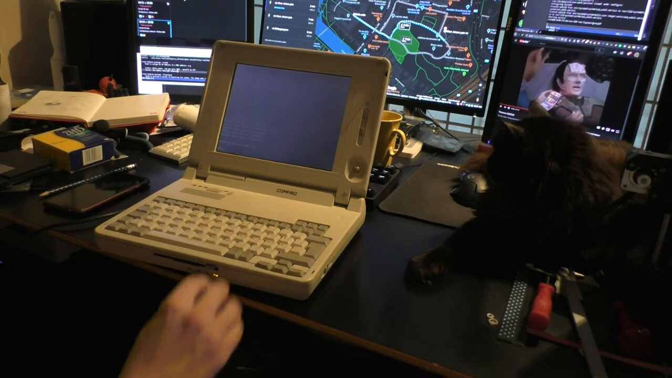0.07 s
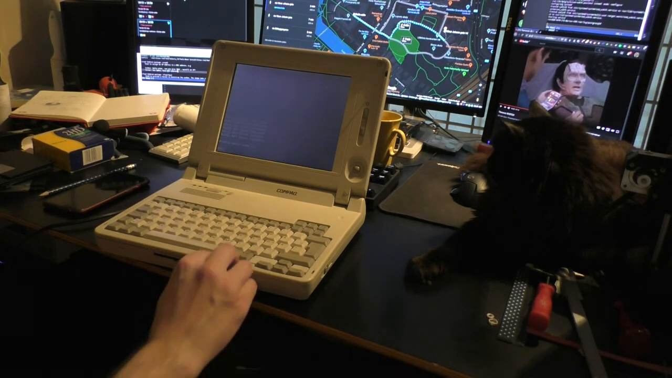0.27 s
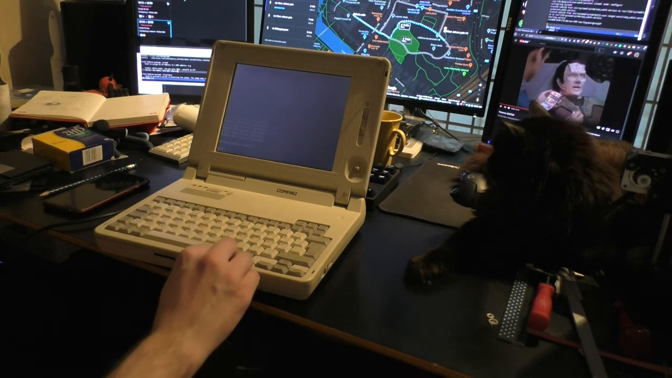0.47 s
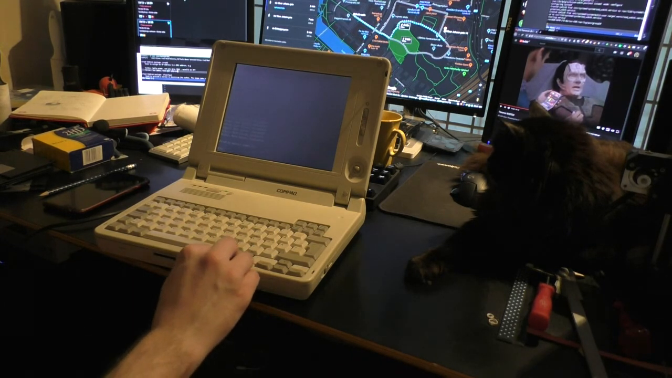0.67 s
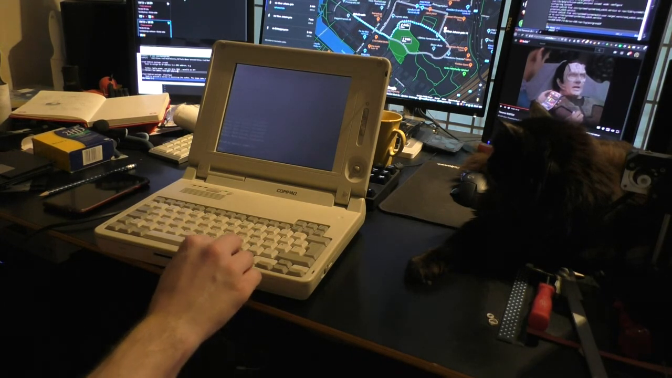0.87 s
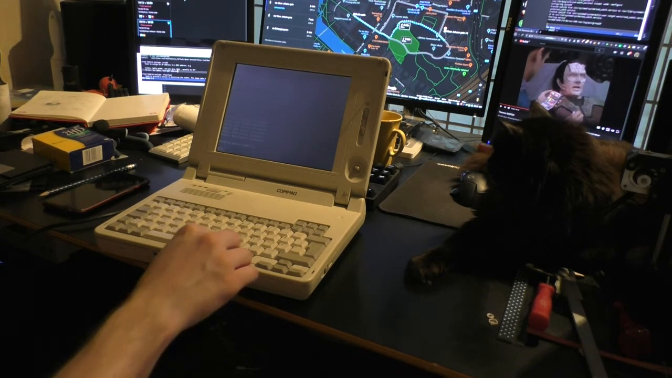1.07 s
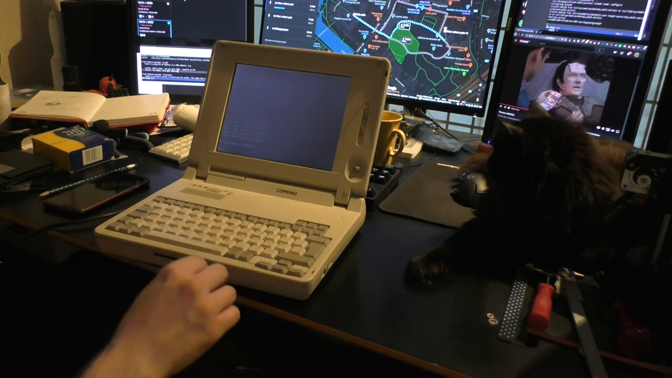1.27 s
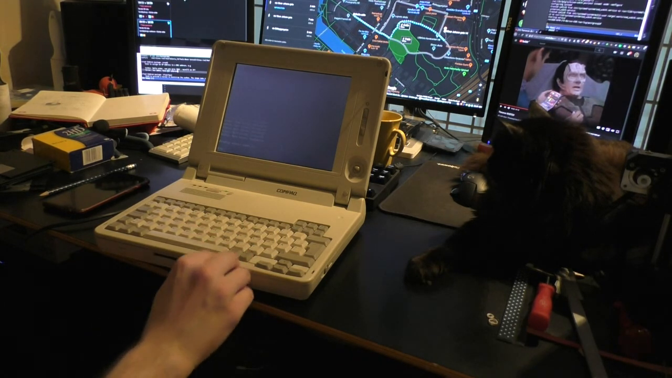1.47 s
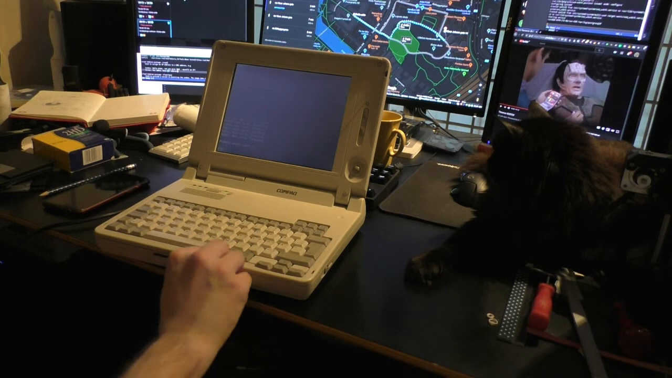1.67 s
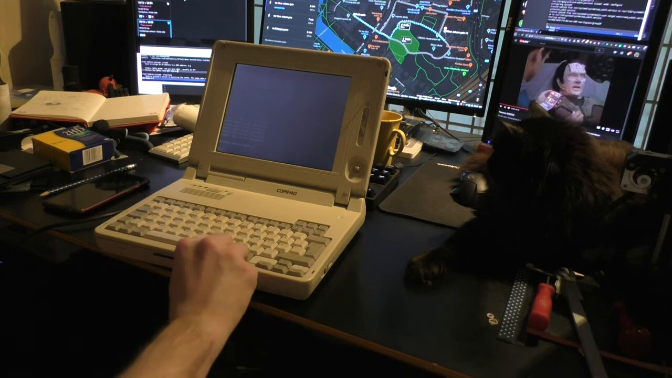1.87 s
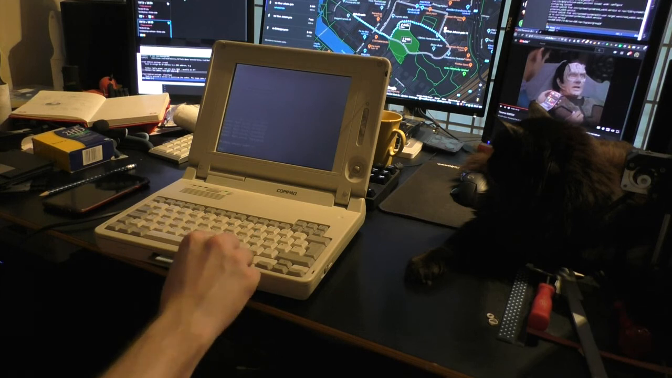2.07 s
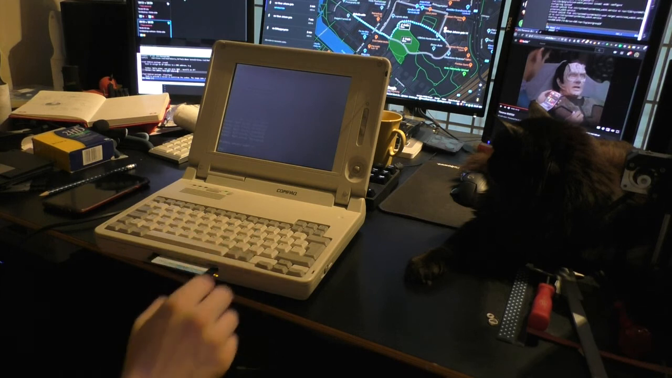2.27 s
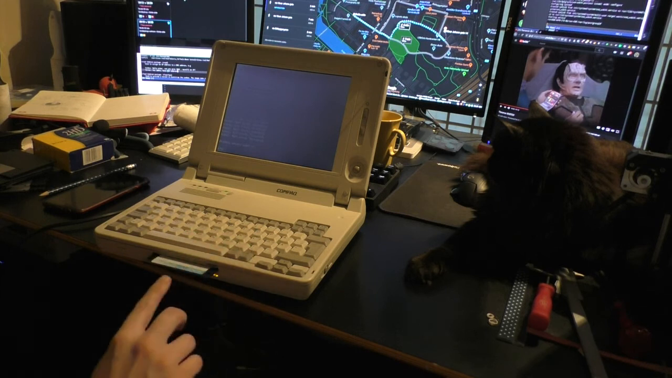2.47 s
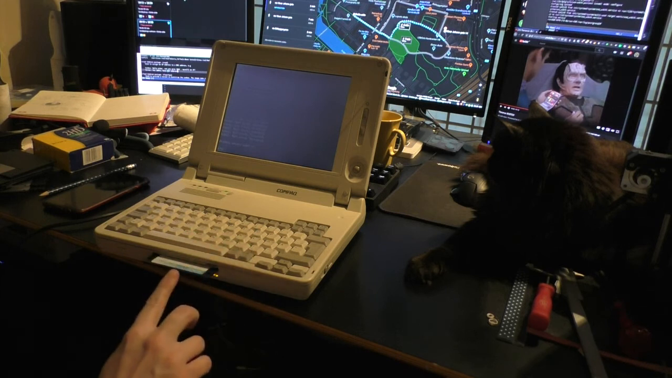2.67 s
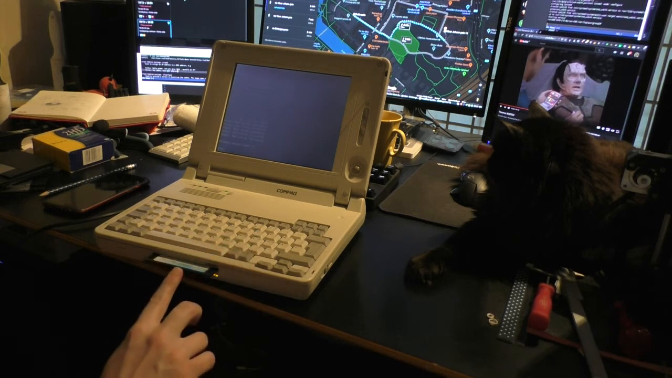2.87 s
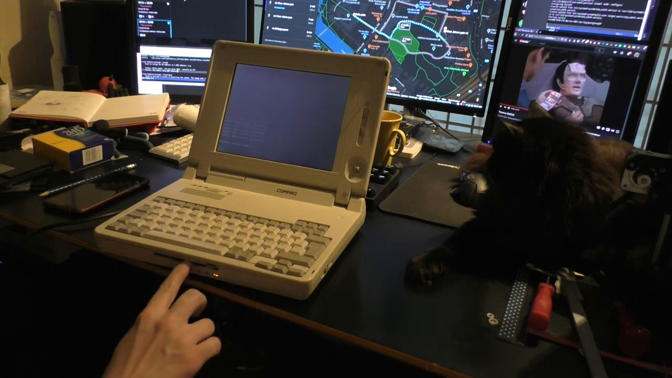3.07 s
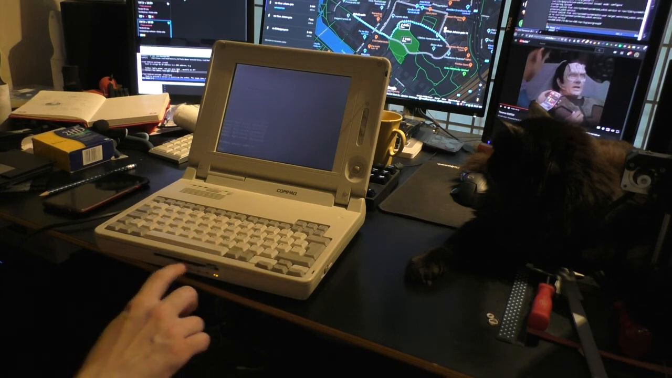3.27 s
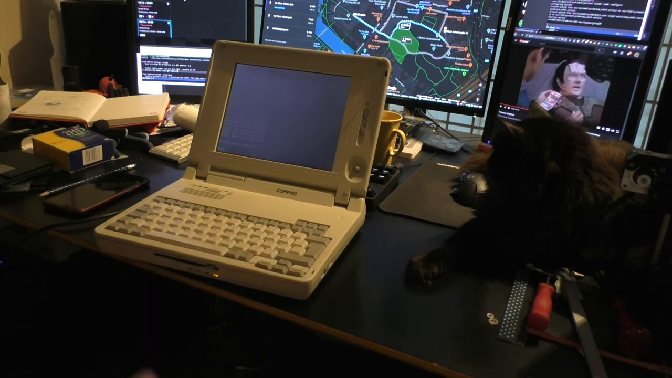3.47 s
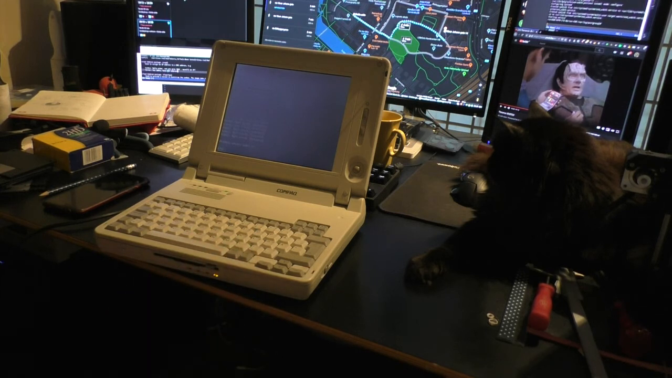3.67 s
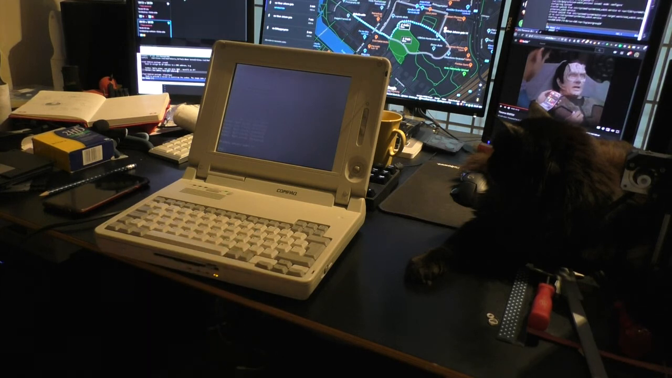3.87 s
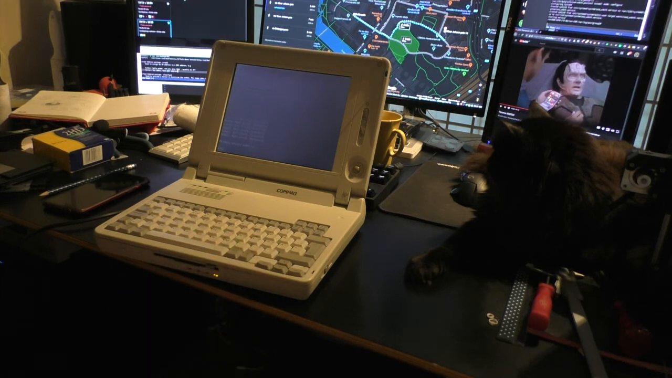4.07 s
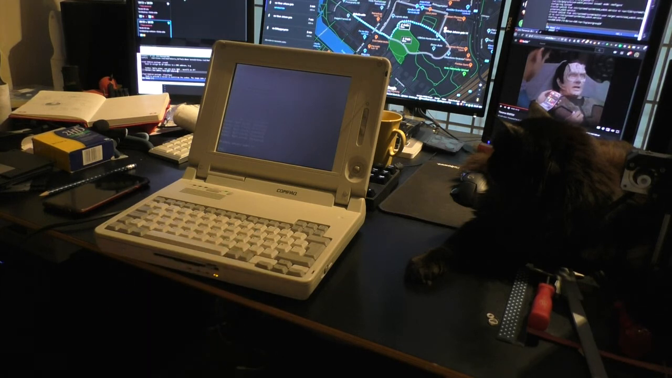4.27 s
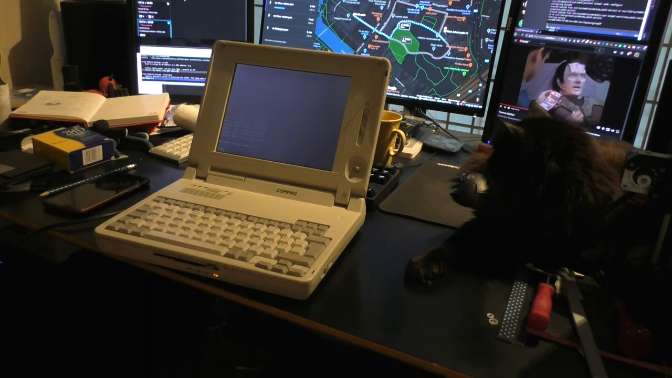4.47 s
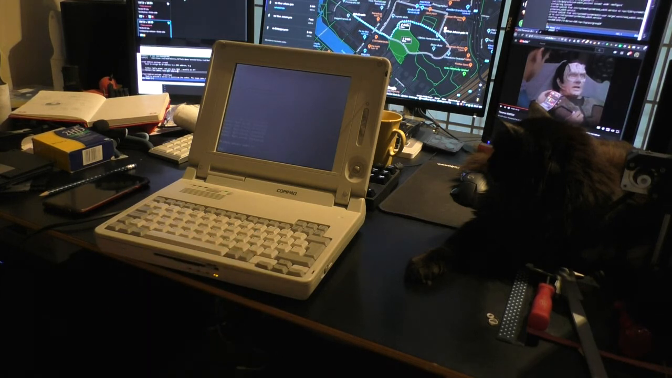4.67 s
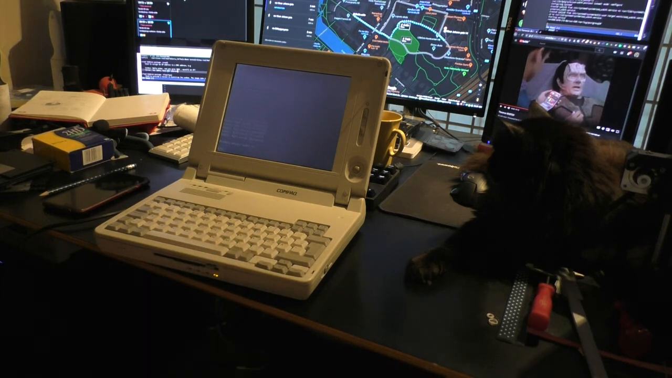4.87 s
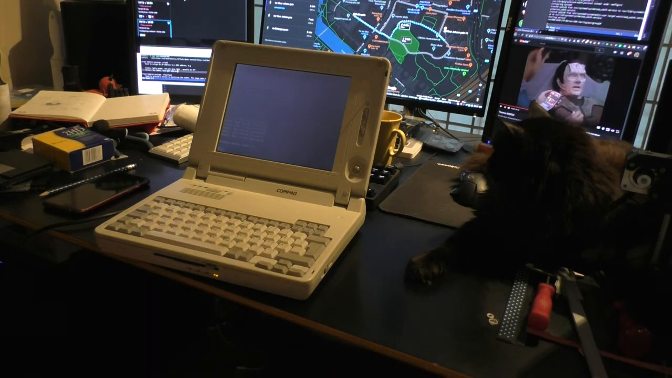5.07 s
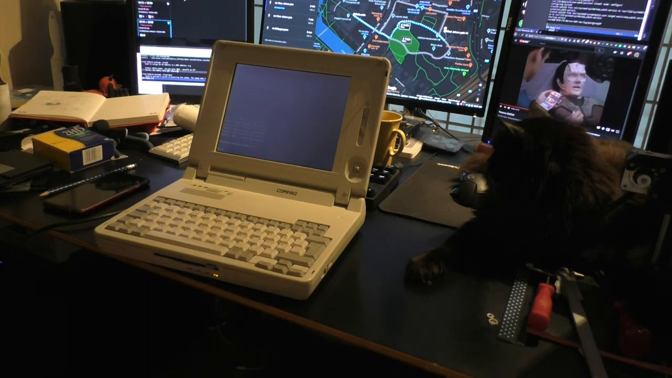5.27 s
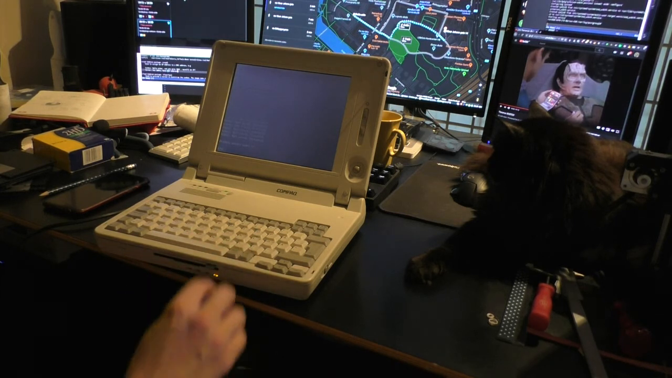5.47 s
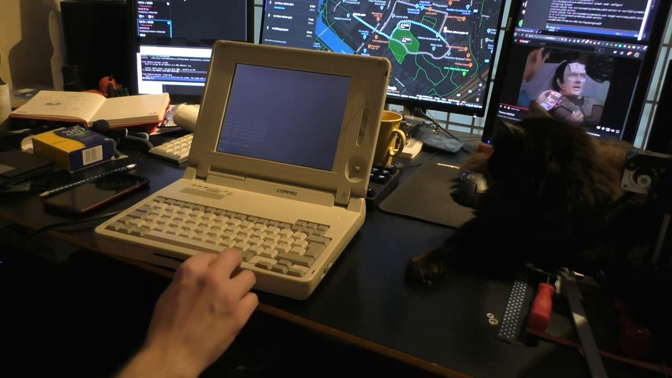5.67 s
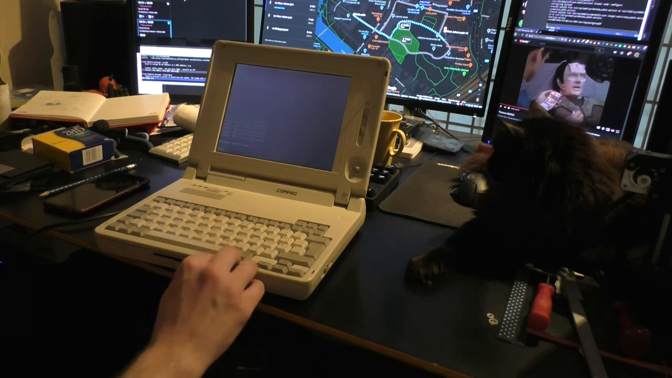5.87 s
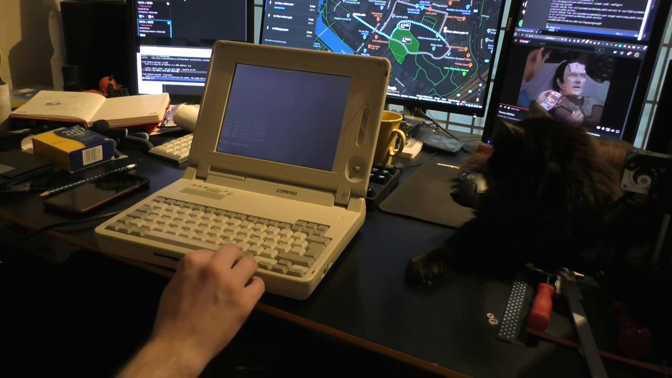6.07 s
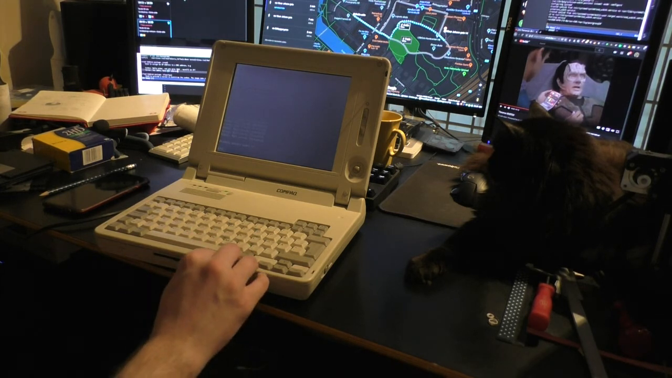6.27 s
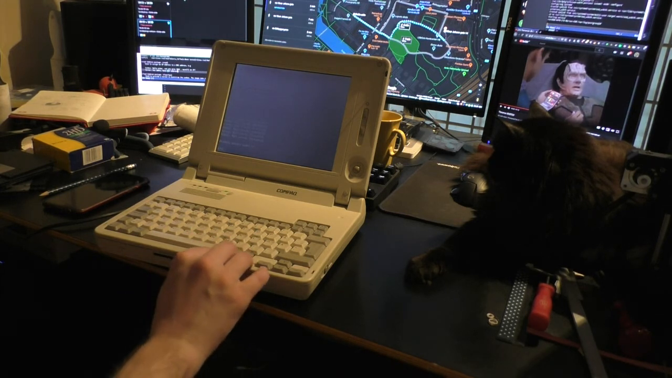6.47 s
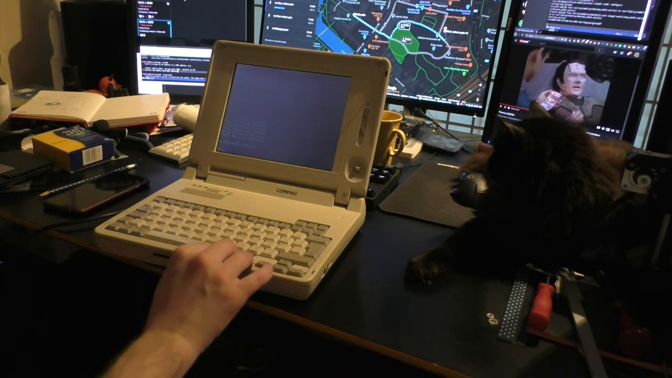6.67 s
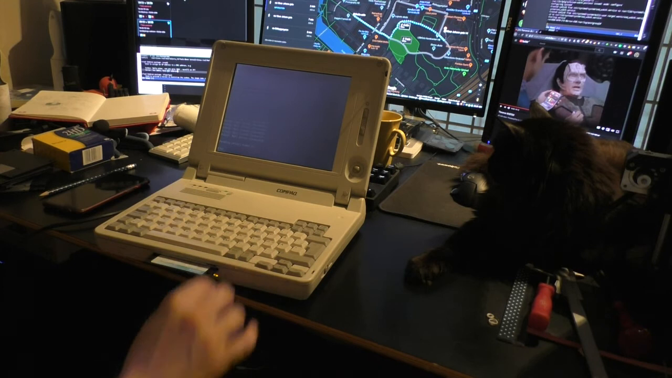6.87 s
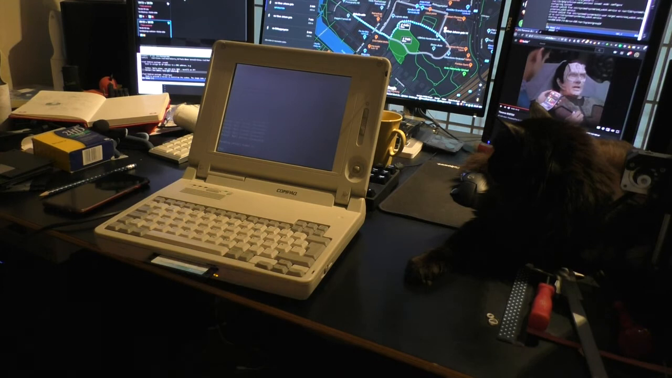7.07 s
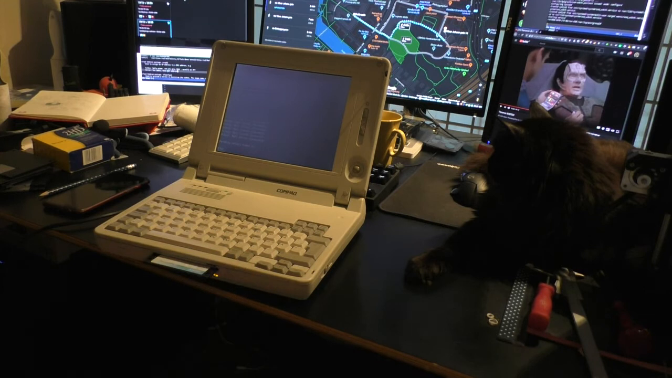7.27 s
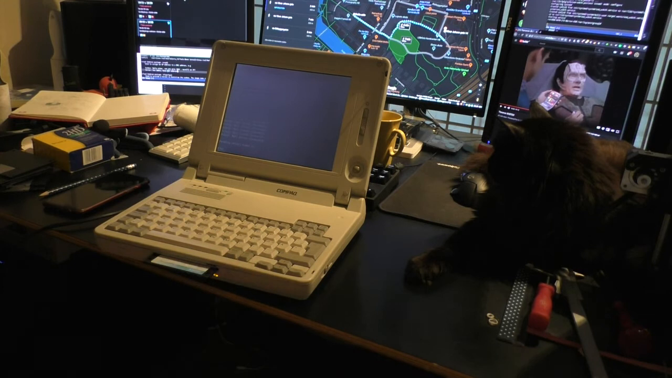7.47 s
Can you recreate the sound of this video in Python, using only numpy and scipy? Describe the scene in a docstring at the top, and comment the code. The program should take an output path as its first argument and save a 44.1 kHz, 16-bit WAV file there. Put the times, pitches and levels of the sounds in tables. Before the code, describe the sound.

Close up in a quiet room, a floppy drive struggles to read, its unsteady motor whine mixed with the scratchy rubbing of the disk. It winds down and plastic clicks pop the disk out of the laptop. A sharp latching clack and a desk thump restart the whining and rasping for a few seconds. It slows again and more eject clicks follow, with soft computer fans underneath throughout.

```python
"""An old laptop on a desk in a quiet room, heard up close in stereo, tries to read a floppy disk.
At first the drive whines and rasps at a wavering speed, the rubbing disk catching now and then.
It coasts down, and near 2 s the disk is ejected with plastic clicks and slides that ring the case.
Pushed back in, the disk latches at 3.1 s with a loud clack and a bump through the desk. The drive labours
again, runs down after 6.5 s, and the disk is ejected once more. Fan noise carries on underneath."""
import sys
import numpy as np
from scipy import signal
from scipy.fft import rfft, irfft, next_fast_len
from scipy.io import wavfile
from scipy.ndimage import uniform_filter1d

SR = 44100
rng = np.random.default_rng(int(sys.argv[2]) if len(sys.argv) > 2 else 0)


def to_wav(s):
    """Save 16-bit WAV."""
    ch = np.atleast_2d(s).T  # columns
    pcm = np.round(np.clip(ch, -1, 1) * 32767)  # PCM
    wavfile.write(sys.argv[1], SR, pcm.astype(np.int16))


N = 331632
TIME = np.arange(N) / SR
FFT_SIZE = next_fast_len(N + SR, True)
FREQS = np.maximum(np.fft.rfftfreq(FFT_SIZE, 1 / SR), 1)


# whine partials, in-between orders from stick and slip: (multiple, level [dB], phase scatter [rad])
WHINE_PARTIALS = [(1.5, -24, 0.53), (2, -7, 0.5), (2.125, -29, 0.55), (2.5, -26, 1.6), (2.625, -28, 1),
                  (3, -5.3, 0.55), (4, -6, 0.43), (5, -7.5, 0.9), (6, -14.5, 0.49), (7, -16, 1.0)]
# frame resonances where a passing overtone sings out: (frequency [Hz], width [Hz], lift [dB])
FRAME_MODES = [(2100, 61, 6.5), (2875, 84, 6)]

def whine(rotor_phase, pitch_hz, slip, tone_db, overtone_db, flutter_db=0.82, unsteady_db=2.9):
    """The drive's tone, a little to the left, breaks up as it runs down; slip scatters its overtones."""
    slowing = np.gradient(uniform_filter1d(pitch_hz, size=900)) < 0
    stalling = np.clip((688 - pitch_hz) / 80, 0, 1) * slowing
    phase = rotor_phase + 1.43 * uniform_filter1d(stalling, size=900) * drift(83)
    fundamental = np.sin(phase + np.array([[0.4], [0]]))  # the two sides are slightly out of phase
    out = from_db(tone_db + flutter_db * drift(25)) * fundamental * pan(left_db=1.5)
    for multiple, level_db, scatter in WHINE_PARTIALS:
        partial = np.sin(multiple * phase + scatter * slip * drift(26) + np.array([[0], [0.35]]))
        lift_db = peaks_db(FRAME_MODES, multiple * pitch_hz)
        gain = from_db(overtone_db + level_db + lift_db + unsteady_db * slip * drift(24))
        out += gain * partial * pan(left_db=3.5)
    return np.sqrt(2) * out


# colours of the rubbing disk's rasp and hiss: (frequency [Hz], level [dB])
RASP_COLOUR = [(100, -9.5), (350, -5.5), (560, -14.5), (700, -8), (850, -32), (1050, -4), (1600, -7),
               (1850, 1.5), (3100, 3), (4200, -4), (6500, -19), (9000, -17.5), (16000, -49)]
HISS_COLOUR = [(3000, -10), (5200, 9.5), (5900, 5), (6600, 8.5), (8300, -1.5), (9600, 0), (10800, 5),
               (12200, 3), (14000, 1.5), (16000, -8)]
# resonances of the drive: (frequency [Hz], width [Hz], lift [dB])
RASP_MODES = [(1076, 74, 11), (1174, 97, 5.8), (1348, 30, 8.4), (1499, 117, 10.2), (1760, 75, 7.8),
              (1830, 22, 2.1), (2448, 21, 8.5), (2870, 25, 1.3), (3550, 190, 2.1)]
# where the drive sits in the stereo image: (frequency [Hz], left minus right [dB])
DRIVE_POSITION = [(150, -4.5), (400, -0.5), (1100, 3), (1800, 3.5), (4000, 1), (8000, 0), (12000, 3),
                  (15500, 1.5)]

def rubbing(rotor_phase, rasp_db, hiss_db, grain_db=1.5, throb=0.28):
    """Friction grains, pressed out in step with the rotor, ring the drive's frame and hiss above it."""
    beat = np.cos(rotor_phase) + np.cos(rotor_phase * 9 / 8)
    pressure = rms_one((1 + throb * beat) * from_db(grain_db * drift(170)))
    fine_grains = rms_one(from_db(grain_db * drift(700)))
    rasp = from_db(rasp_db) * pressure * stereo_noise(alike=0.7)
    hiss = from_db(hiss_db) * fine_grains * stereo_noise(alike=1.0)
    # the thin metal cover has many narrow peaks and dips in the treble
    cover_modes = [(hz, 80, 1.7 * rng.standard_normal()) for hz in rng.uniform(3800, 15000, 60)]
    place = pan(at_hz(DRIVE_POSITION, FREQS))
    return (through(rasp, place * response(RASP_COLOUR, RASP_MODES))
            + through(hiss, place * response(HISS_COLOUR, cover_modes)))


# resonances that slipping sets squealing: (frequency [Hz], relative level [dB])
SQUEAL_MODES = [(1056, -12.3), (2396, -11.3), (2547, -11.3)]

def squeals(wander_hz=28, flicker_db=0.5):
    """Narrow resonances whose strength and phase wander as the contact catches and lets go."""
    out = 0
    for hz, level_db in SQUEAL_MODES:
        swing = (drift(wander_hz) + 1j * drift(wander_hz)) * np.exp(2j * np.pi * hz * TIME)
        out += from_db(level_db) * rms_one(swing.real * from_db(flicker_db * drift(2.5)))
    return out * pan(left_db=3.5)


# the two tries at reading: (motor on [s], motor off [s], coasting time constant [s])
MOTOR_RUNS = [(-1, 0.85, 0.24), (3.09, 6.56, 0.18)]

def motor(spin_up_s=0.055, seating_s=0.075, seating_db=42):
    """Share of full speed as the motor spins up and coasts down, and level lost until the disk seats."""
    speed, unseated_db = np.zeros((2, N))
    for on, off, coast_s in MOTOR_RUNS:
        age, coasting = np.maximum(TIME - on, 0), np.maximum(TIME - off, 0)
        speed += (1 - np.exp(-age / spin_up_s)) * np.exp(-coasting / coast_s)
        unseated_db += (TIME > on) * seating_db * np.exp(-age / seating_s)
    return speed, unseated_db


# the whine's fundamental at full speed, one curve per try: (time [s], level [dB])
FIRST_LEVEL = [(0.0, -47.5), (0.046, -45.5), (0.534, -44.5), (0.566, -46.5), (0.71, -45), (0.73, -50.5),
               (0.84, -48)]
SECOND_LEVEL = [(3.35, -42.5), (3.42, -41.5), (3.78, -44.5), (4.34, -42), (4.59, -44), (4.65, -41.5),
                (4.96, -47), (5.14, -42), (5.17, -52.5), (5.26, -44), (5.77, -40.5), (6.31, -45),
                (6.33, -43), (6.54, -47.5)]
# the disk briefly catches (plus) or runs free (minus):
# (time [s], half length [s], overtones [dB], rasp [dB], hiss [dB])
DISK_CATCHES = [(0.25, 0.12, 3, -1, 0.9), (0.53, 0.13, -0.5, -0.4, -2), (0.73, 0.016, -10, -1.5, -2),
                (0.778, 0.024, 4.5, 1, 1), (0.87, 0.028, -8, 2, 2), (0.922, 0.055, 0, 5, 0),
                (4.37, 0.035, 8, -1, 1.3), (4.751, 0.03, 5, -1.5, 1.5), (5.779, 0.027, 5.5, -3.5, 2),
                (6.122, 0.12, -7.5, 0.7, -1), (6.361, 0.033, 5.5, 3.5, -0.5), (6.42, 0.03, -4, 2.5, -6),
                (6.544, 0.038, -2.5, 2, -4), (6.605, 0.024, -6, 3, 6)]

def drive_levels(speed, unseated_db, slip):
    """Every layer follows speed and seating; slip drains the overtones and feeds the rasp a little."""
    speed_db = 20 * np.log10(speed + 1e-9)
    squeak_db, scrape_db, fizz_db = sum(np.outer(extra_db, np.exp(-((TIME - s) / half_s) ** 2))
                                        for s, half_s, *extra_db in DISK_CATCHES)
    tone_db = in_time([*FIRST_LEVEL, *SECOND_LEVEL]) + 2.4 * speed_db - unseated_db
    overtone_db = -42.5 - 7.0 * slip + 2.9 * speed_db - 0.21 * unseated_db + squeak_db
    rasp_db = -43.5 + 1.9 * (slip - 1) + 1.56 * speed_db - 0.11 * unseated_db + scrape_db
    hiss_db = -51 + 2.8 * speed_db - unseated_db + fizz_db
    return tone_db, overtone_db, rasp_db, hiss_db


# the whine at full speed, wandering as the disk drags, one curve per try: (time [s], pitch [Hz])
FIRST_WANDER = [(0.0, 720.2), (0.138, 705), (0.23, 717), (0.41, 711), (0.442, 703), (0.62, 715),
                (0.726, 701), (0.84, 706)]
SECOND_WANDER = [(3.35, 709), (3.62, 706.4), (3.68, 712), (3.8, 715), (3.93, 693.6), (4.06, 708),
                 (4.34, 698.5), (4.56, 711.9), (4.62, 697), (4.68, 699), (4.8, 719.6), (4.93, 725),
                 (5.11, 716), (5.21, 732), (5.26, 713.4), (5.51, 705.3), (6.26, 709.5), (6.54, 695)]
# how badly the parts slip, smooth just after spin-up: (time [s], slip [1 = usual])
SLIP_CURVE = [(0, 1.03), (.55, 1.3), (.85, 0.44), (3.2, 0.21), (3.7, .35), (4.1, 1.07), (5.0, 1.32),
              (6.15, 1.25), (6.5, 0.45)]

def floppy_drive(jitter=0.00209):
    """One motor turns the unevenly dragging disk; returns its whine and its friction noise."""
    speed, unseated_db = motor()
    slip = in_time(SLIP_CURVE)
    pitch_hz = speed * in_time([*FIRST_WANDER, *SECOND_WANDER])
    tone_db, overtone_db, rasp_db, hiss_db = drive_levels(speed, unseated_db, slip)
    rotor_phase = 2 * np.pi * np.cumsum(pitch_hz * (1 + jitter * slip * drift(16.15))) / SR
    friction = rubbing(rotor_phase, rasp_db, hiss_db) + from_db(rasp_db) * slip * squeals()
    return whine(rotor_phase, pitch_hz, slip, tone_db, overtone_db), friction


# button, latch and shutter: (time [s], level [dB], t60 [s], bass [dB], treble [dB], top [dB], ring [Hz])
LATCH_CLICKS = [ (1.595, -49.5, 0.058, 8, -6, -14, 490), (1.743, -39, 0.085, 3, 0.5, -4.5, 1900),
                (1.868, -42, 0.13, 3, -8, -13, 1030), (1.874, -35, 0.074, -1, -1, -9, 1020),
                (1.877, -29.5, 0.06, 2.5, -1, -7, 1040), (1.887, -37.5, 0.12, 3, 17.5, 11, 1040),
                (2.018, -42.5, 0.078, 2, 3, -6, 2100), (2.130, -33, 0.11, -8, 1.5, 7.5, 2370),
                (2.140, -32.5, 0.054, -1, 7, 3, 2860), (2.868, -50.5, 0.28, -1, -7, -24, 2190),
                (2.909, -47.5, 0.062, -4, -5, -10, 1330), (2.933, -44.5, 0.17, 3, -0.5, -15, 2020),
                (3.07, -38.5, 0.1, 0, 6, 0, 1330), (3.086, -18, 0.052, -2, -4.5, 3, 3160),
                (3.091, -16, 0.04, -19, 1, 3, 1324), (3.101, -13, 0.009, 7, 6, 2, 1740),
                (6.619, -32.5, 0.16, -4, 0.5, -6.5, 2660), (6.820, -44.5, 0.11, -11, 11, -8, 1050),
                (6.860, -32.5, 0.092, -9, -3.5, 7, 2470), (6.869, -36, 0.068, -1, -8, 8, 4800),
                (6.887, -40, 0.05, 4, 9, -6, 1040), (7.099, -50.5, 0.049, 6, -1, -7, 2260),
                (7.241, -46.5, 0.091, -10, -12, -26, 1210), (7.244, -47, 0.11, -24, -14, -26, 1560)]
# disk and button sliding: (start [s], end [s], level [dB], bass [dB], treble [dB])
DISK_SLIDES = [(1.004, 1.034, -47.5, -8, -7), (1.446, 1.468, -59, 6, -4), (1.566, 1.589, -54.5, 2, -11),
               (1.82, 1.842, -52, 11, -6), (2.027, 2.095, -55, 0, -1), (2.083, 2.128, -46.5, -5, -0.5),
               (2.961, 3.053, -56, 1, 2), (3.037, 3.108, -49.5, -11, -2), (6.772, 6.83, -54.5, -2, -9),
               (6.822, 6.861, -46, -5, 4), (7.227, 7.235, -50, 12, -13)]
# colour of the struck plastic case: (frequency [Hz], level [dB])
CASE_COLOUR = [(80, -38), (200, -10.5), (420, -7.5), (600, -6.5), (820, -12), (1000, -4.5), (1900, -6),
               (3300, -7.5), (6000, -11.5), (10000, -13), (13000, -14), (16000, -20)]
# its resonances: (frequency [Hz], width [Hz], lift [dB])
CASE_RESONANCES = [(405, 80, 9.2), (984, 35, 2), (1050, 59, 3.4), (1360, 35, 5.5), (1650, 36, 3.9),
                   (2170, 75, 4.4), (3370, 230, 2.5), (4100, 42, 1.6), (4490, 100, 7.5)]

def eject_mechanism(attack_s=0.00044, slide_ramp_s=0.0084, ring_db=11.0, chatter_db=0.5):
    """Clicks are brief swarms of plastic contacts, slides are longer ones; both ring the case."""
    contacts, t = np.zeros((2, N)), TIME[:SR // 3]
    for s, level_db, t60, bass_db, treble_db, top_db, ring_hz in LATCH_CLICKS:
        tint = [(400, bass_db), (1100, 0), (3000, treble_db), (12000, top_db)]
        ring = [(ring_hz, 0.12 * ring_hz, ring_db)]
        swarm = tinted(stereo_noise(alike=0.84, size=len(t)), tint, CASE_COLOUR, ring)
        add(contacts, s, swarm * from_db(level_db - 60 * t / t60) * (1 - np.exp(-t / attack_s)))
    for start, end, level_db, bass_db, treble_db in DISK_SLIDES:
        stroke = np.clip(np.minimum(t, end - start + 0.011 - t) / slide_ramp_s, 0, 1)
        tint = [(400, bass_db), (1100, 0), (4000, treble_db), (14000, treble_db - 6.0)]
        scrape = tinted(stereo_noise(alike=0.91, size=len(t)), tint, CASE_COLOUR)
        add(contacts, start, from_db(level_db) * stroke * scrape)
    chatter = rms_one(from_db(chatter_db * drift(540)))
    place = pan(0.74 * at_hz(DRIVE_POSITION, FREQS))
    return through(contacts * chatter, place * response(CASE_COLOUR, CASE_RESONANCES))


# dull bumps through the desk: (time [s], level [dB], t60 [s])
DESK_BUMPS = [(1.825, -49, 0.19), (1.876, -55, .22), (3.094, -33, 0.38), (7.32, -57, .12)]
# colour of the desk top: (frequency [Hz], level [dB])
DESK_COLOUR = [(40, -37), (90, -11), (125, 1.5), (165, -3), (240, -6.5), (350, -7), (520, -12), (900, -31)]
# its resonances: (frequency [Hz], width [Hz], lift [dB])
DESK_RESONANCES = [(125, 14, 8), (198, 25, 4), (370, 30, 5)]

def desk():
    """The desk top booms briefly, a little to the right, when the laptop is pushed."""
    bumps, t = np.zeros((2, N)), TIME[:SR // 2]
    for s, level_db, t60 in DESK_BUMPS:
        add(bumps, s, from_db(level_db - 60 * t / t60) * stereo_noise(alike=0.94, size=len(t)))
    return through(bumps, response(DESK_COLOUR, DESK_RESONANCES)) * pan(left_db=-2.5)


# decay of the room around the desk: (frequency [Hz], t60 [s])
ROOM_DECAY = [(150, 0.77), (1000, 0.63), (4000, 0.32), (9000, 0.43), (15000, 0.17)]

def room(sound, build_s=0.0023):
    """Diffuse reflections, different on each side, dying sooner in the treble."""
    t, tail = TIME[:SR // 2], 0
    edges = np.geomspace(80, 16000, 9)
    for low, high in zip(edges, edges[1:]):
        bandpass = signal.butter(2, [low, high], "band", fs=SR, output="sos")
        band = signal.sosfilt(bandpass, stereo_noise(alike=0.76, size=len(t)))
        tail += band * from_db(-60 * t / at_hz(ROOM_DECAY, np.sqrt(low * high)))
    tail = rms_one(tail * (1 - np.exp(-t / build_s))) / np.sqrt(len(t))
    return through(sound, rfft(tail, FFT_SIZE))


# colour of the fan noise in the room: (frequency [Hz], relative level [dB])
FAN_COLOUR = [(15, -9), (25, -15), (49, -4), (92, -7), (137, 2.5), (335, -8), (451, -9), (754, -25.5),
              (887, -7), (1020, -10.5), (1230, -7.5), (2280, -15.5), (4370, -18.5), (7920, -28.5),
              (16000, -24)]
# steady tones of running computers: (frequency [Hz], level [dB])
IDLE_TONES = [(145.3, -76), (1211, -75.5), (2396, -83), (2950, -77.5), (3015, -80), (3187, -81),
              (3354, -77), (3515, -82), (3784, -81.5), (4134, -77), (4172, -95), (4328, -81), (4441, -73),
              (4716, -82), (4867, -85), (5254, -82.5), (5523, -93), (6062, -115), (6336, -89), (6605, -82)]

def fans(air_db=-57.5, waver_rad=0.33):
    """Room tone: a wide wash of fan noise, with faint wavering computer tones to the left."""
    place = pan(at_hz([(100, -2.0), (400, 0.5), (1000, 0.5), (4000, 1.0), (7000, 0.4)], FREQS))
    modes = [(740, 660, 1.2), (4420, 680, 4.8), (6200, 89, 4.5)]
    air = through(stereo_noise(alike=0.65), place * response(FAN_COLOUR, modes))
    tones = sum(from_db(db) * np.sin(2 * np.pi * hz * TIME + waver_rad * drift(3.8))
                for hz, db in IDLE_TONES)
    return from_db(air_db) * air + np.sqrt(2) * tones * pan(left_db=4.5)


def from_db(db):
    """Decibels to gain."""
    return 10 ** (np.asarray(db) / 20)


def rms_one(x):
    """Scale to unit rms."""
    return x / np.sqrt(np.mean(x ** 2) + 1e-20)


def in_time(points):
    """Join (time [s], value) points by straight lines."""
    return np.interp(TIME, *np.transpose(points))


def at_hz(points, hz):
    """Read (frequency [Hz], value) points on a log-frequency axis."""
    f, value = np.transpose(points)
    return np.interp(np.log(hz), np.log(f), value)


def peaks_db(modes, hz):
    """Summed lift of resonances given as (frequency [Hz], width [Hz], lift [dB])."""
    return sum(db / (1 + (2 * (hz - centre) / width) ** 2) for centre, width, db in modes)


def drift(rate_hz):
    """Smooth random wander of unit rms."""
    return rms_one(through(rng.standard_normal(FFT_SIZE), 1 / (1 + (FREQS / rate_hz) ** 2)))


def response(colour, modes):
    """Causal filter of unit power gain from a broad colour and resonance peaks."""
    gain = rms_one(from_db(at_hz(colour, FREQS) + peaks_db(modes, FREQS)))
    cepstrum = irfft(np.log(gain), FFT_SIZE)
    cepstrum[1:FFT_SIZE // 2] *= 2  # folded for minimum phase
    cepstrum[FFT_SIZE // 2 + 1:] = 0
    return np.exp(rfft(cepstrum))


def through(x, shape):
    """Apply a frequency response."""
    return irfft(rfft(x, FFT_SIZE) * shape, FFT_SIZE)[..., :N]


def tinted(burst, tint, body, modes=()):
    """Recolour a short burst while its power through the body stays the same."""
    hz = np.maximum(np.fft.rfftfreq(burst.shape[1], 1 / SR), 1)
    gain = from_db(at_hz(tint, hz) + peaks_db(modes, hz))
    weight = rms_one(from_db(at_hz(body, hz)))
    return irfft(rfft(burst) * gain / np.sqrt(np.mean((gain * weight) ** 2)), burst.shape[1])


def stereo_noise(alike, size=N):
    """White noise, partly shared by the two sides."""
    mid, side = rng.standard_normal((2, size))
    return np.sqrt((1 + alike) / 2) * mid + np.sqrt((1 - alike) / 2) * np.array([side, -side])


def pan(left_db):
    """Gains of the two sides, overall or per frequency."""
    return from_db(np.array([[0.5], [-0.5]]) * left_db)


def add(out, s, sound):
    """Mix a sound in at a time."""
    start = round(s * SR)
    out[:, start:start + sound.shape[1]] += sound[:, :N - start]


def scene():
    """Drive, eject mechanism and desk up close; reflections and fans behind them."""
    tone, friction = floppy_drive()
    clacks = eject_mechanism()
    reflections = room(from_db(-8.0) * clacks + from_db(-6.5) * friction)
    return tone + friction + clacks + desk() + reflections + fans()


# width of the stereo image: (frequency [Hz], side level [dB])
STEREO_WIDTH = [(150, 4), (700, -0.5), (4000, 2), (5300, -0.5), (6700, -58), (8900, -16), (10800, 5.5),
                (15000, 5.5)]

def record(dry, cutoff_hz=15800):
    """The stereo image narrows almost to mono around 6-9 kHz; the top is cut steeply."""
    mid = (dry[0] + dry[1]) / 2
    side = through((dry[0] - dry[1]) / 2, from_db(at_hz(STEREO_WIDTH, FREQS)))
    lowpass = signal.ellip(12, 0.1, 80, cutoff_hz, fs=SR, output="sos")
    return signal.sosfilt(lowpass, [mid + side, mid - side])


dry = scene()
out = record(dry)
to_wav(out)
```